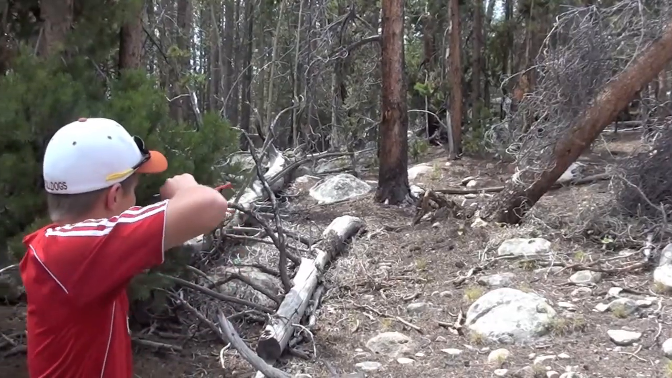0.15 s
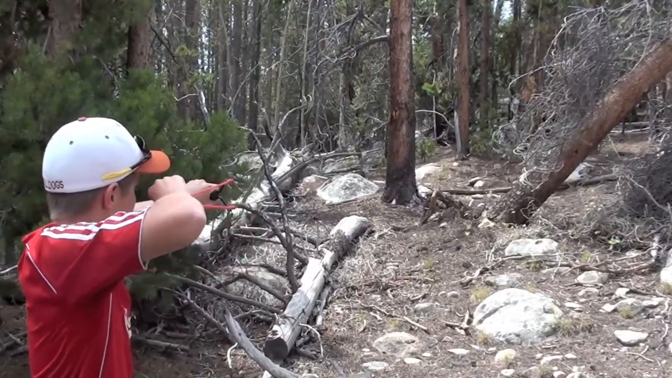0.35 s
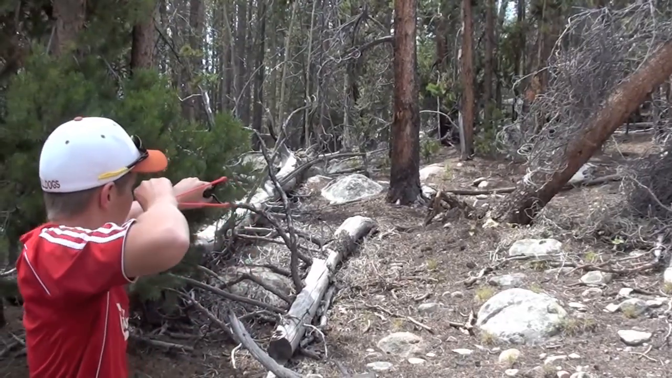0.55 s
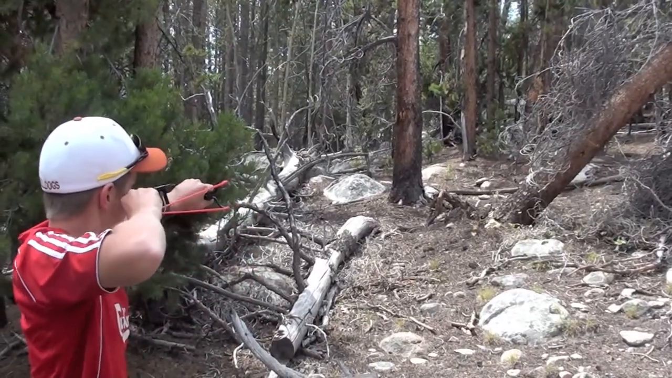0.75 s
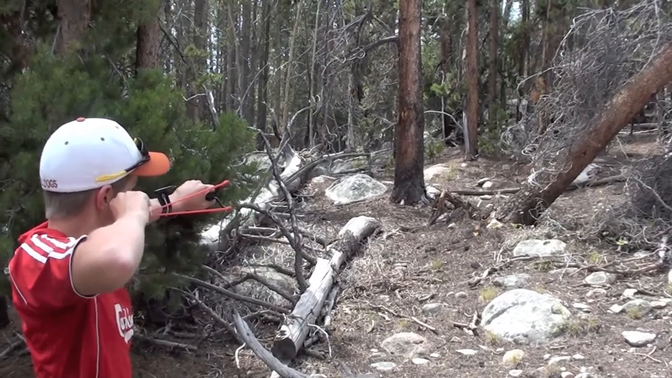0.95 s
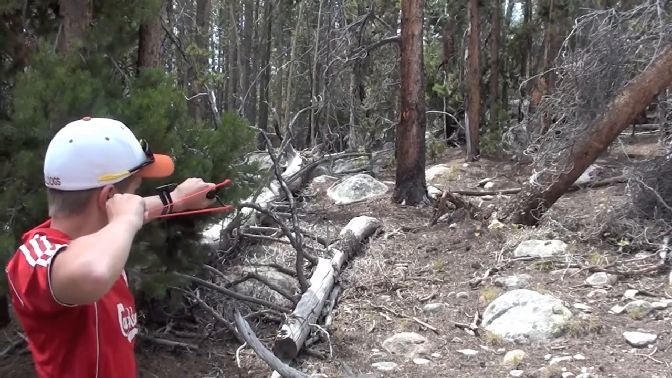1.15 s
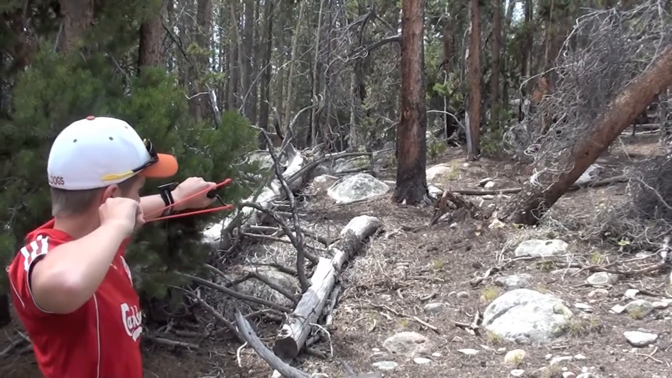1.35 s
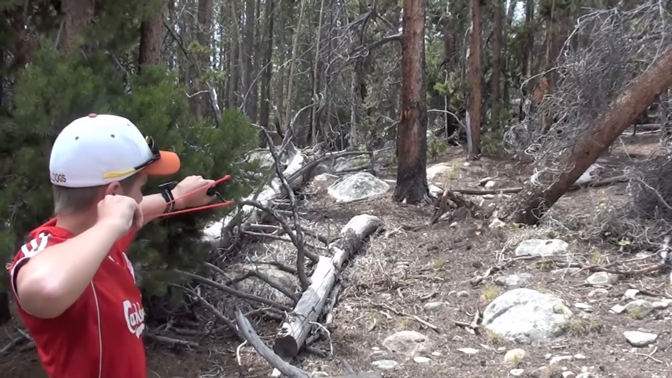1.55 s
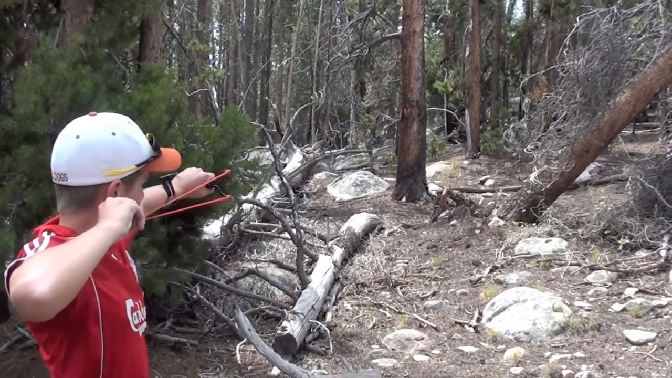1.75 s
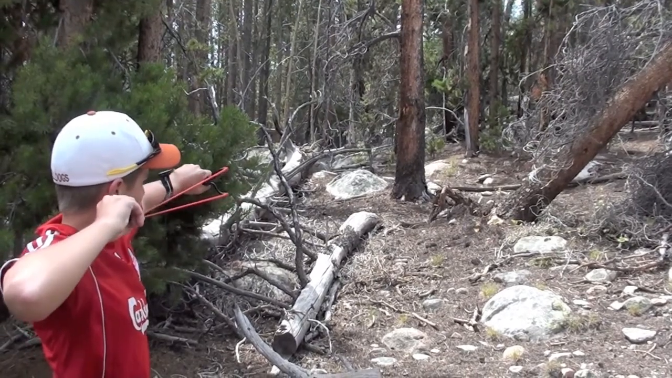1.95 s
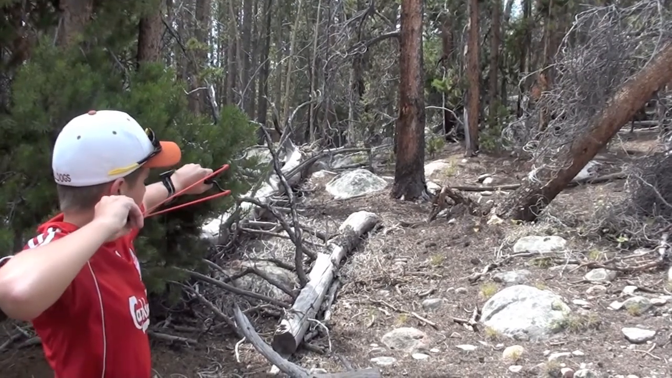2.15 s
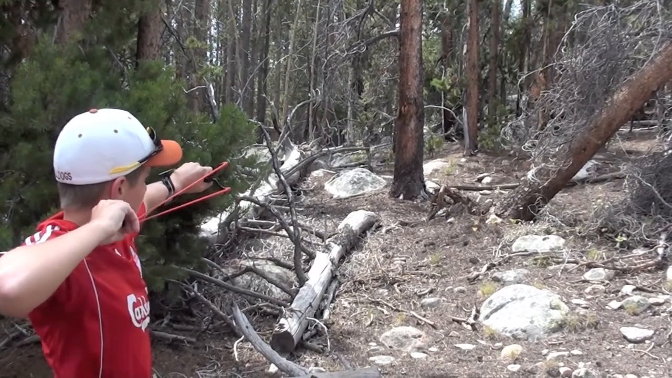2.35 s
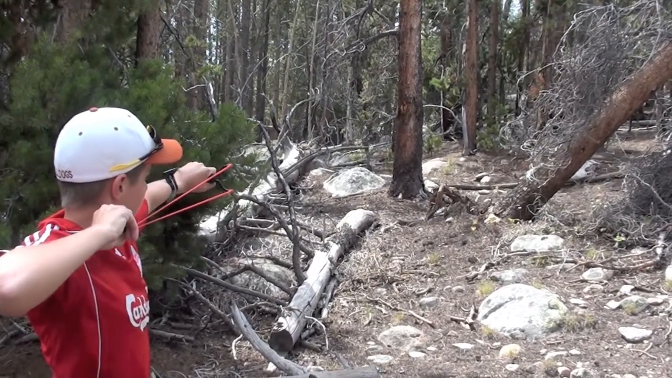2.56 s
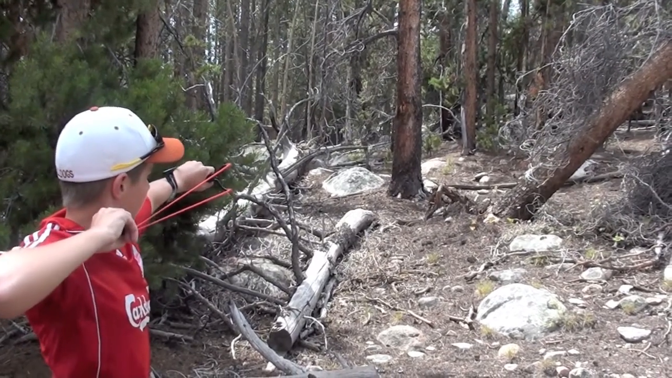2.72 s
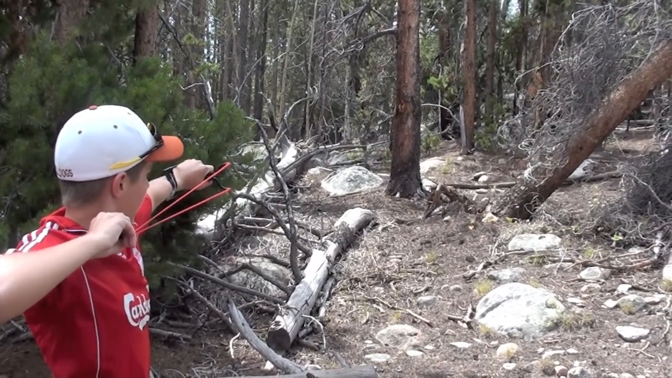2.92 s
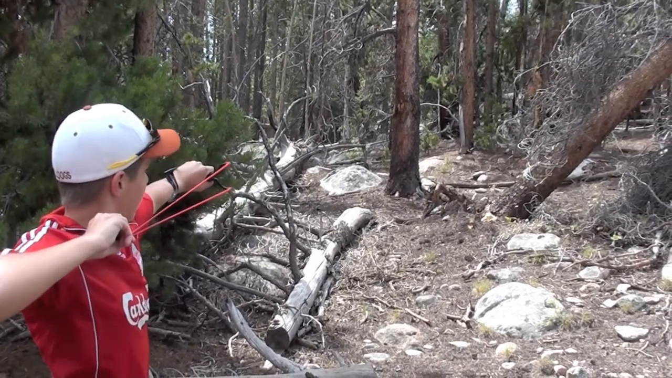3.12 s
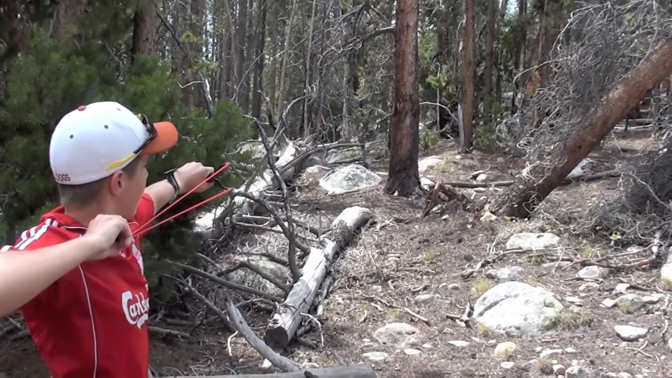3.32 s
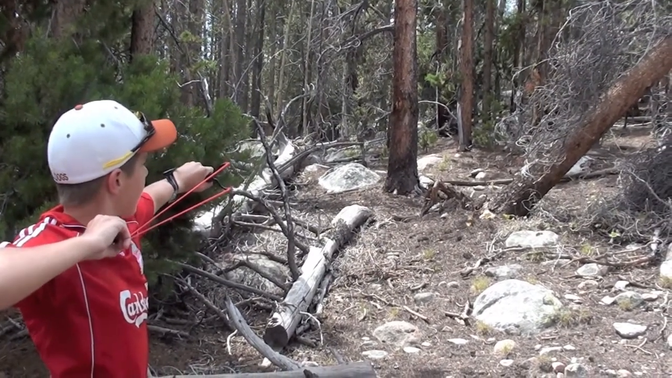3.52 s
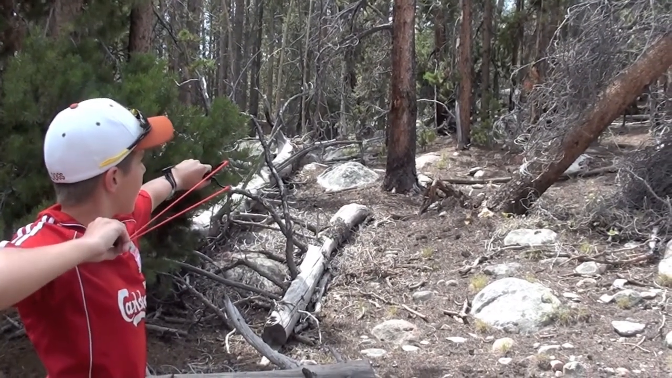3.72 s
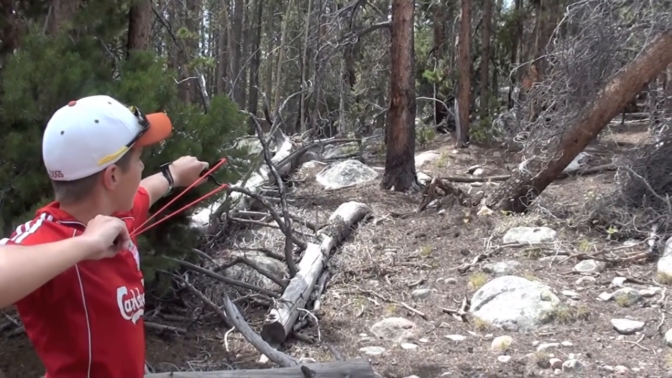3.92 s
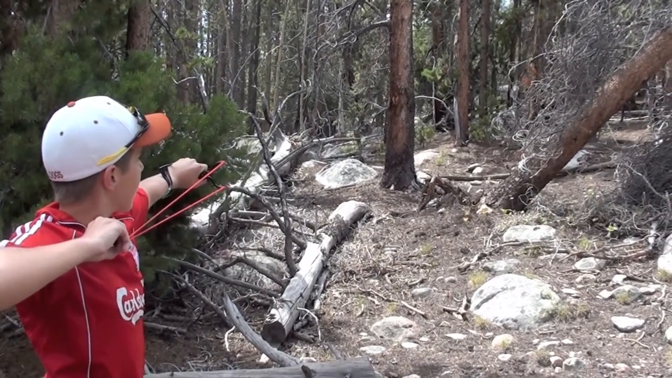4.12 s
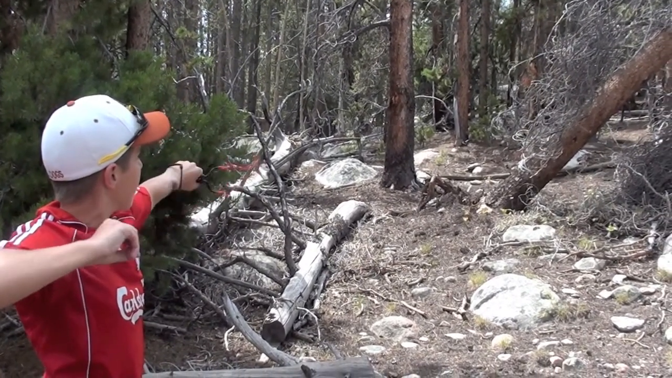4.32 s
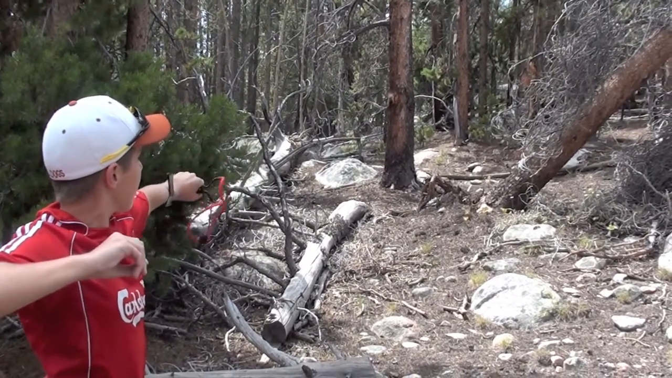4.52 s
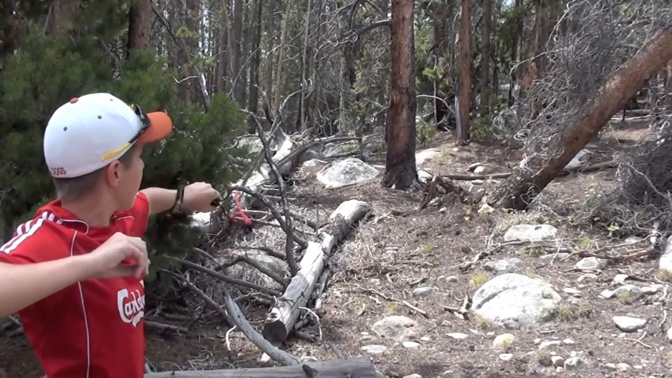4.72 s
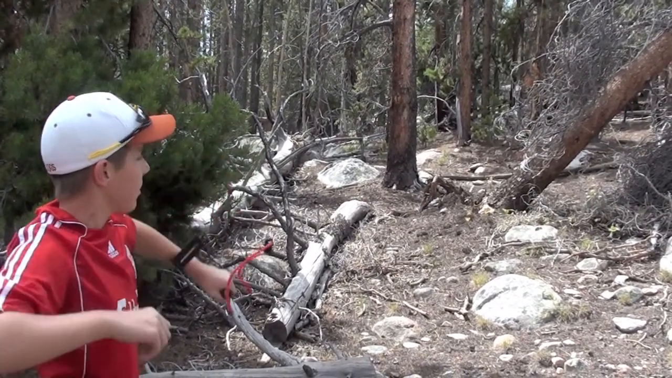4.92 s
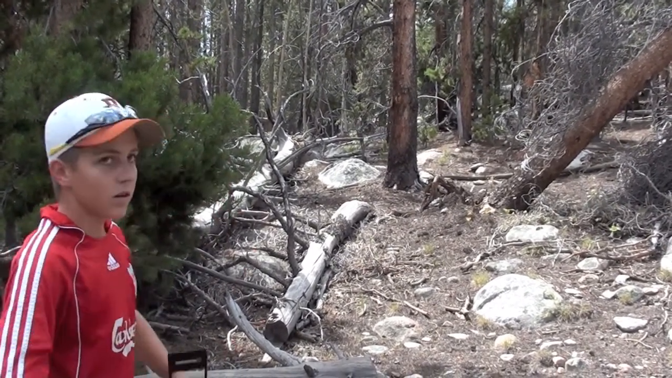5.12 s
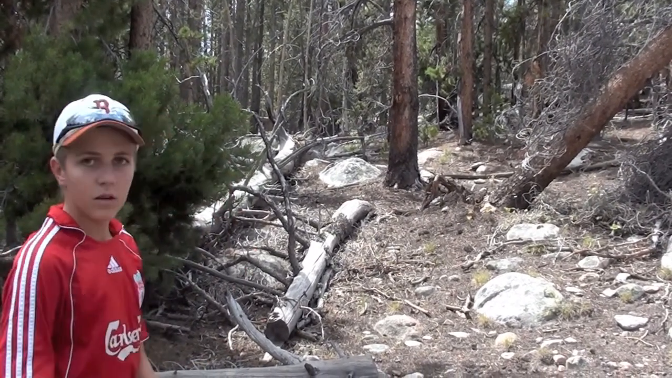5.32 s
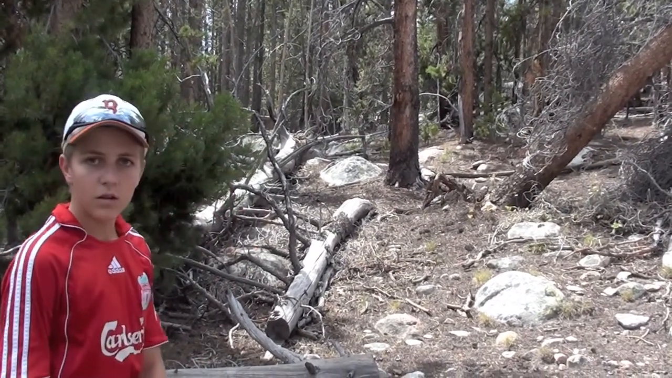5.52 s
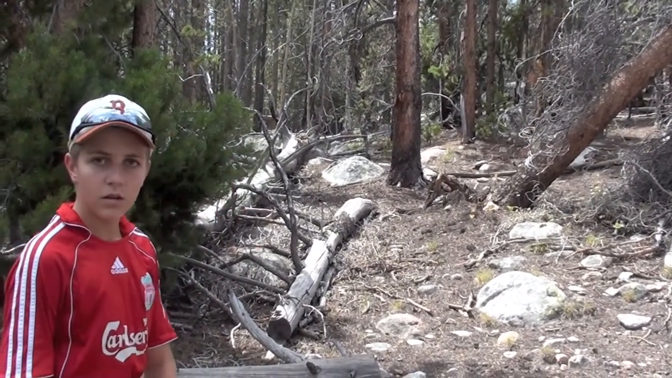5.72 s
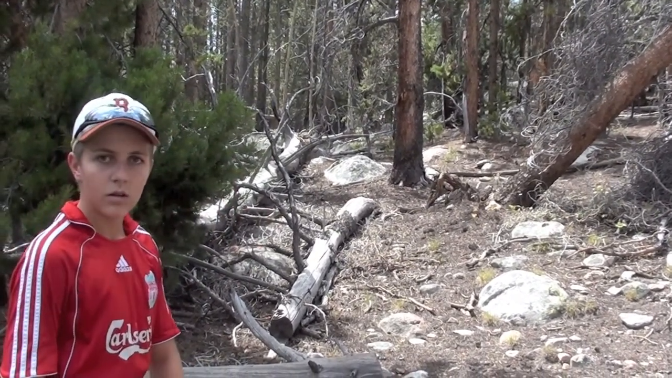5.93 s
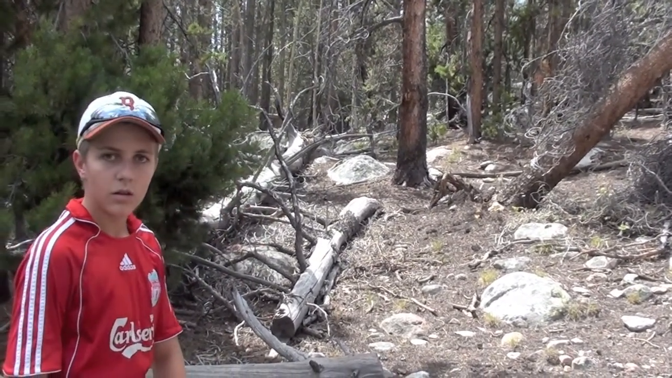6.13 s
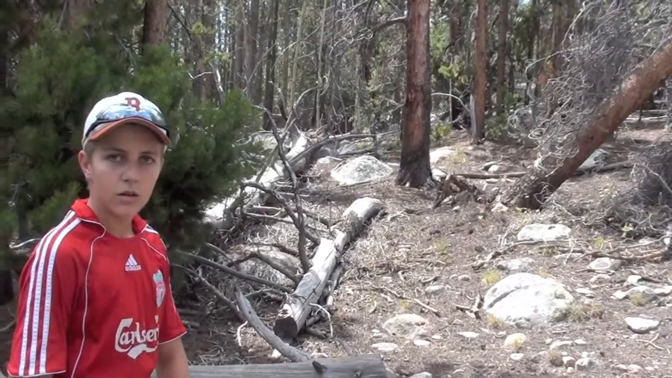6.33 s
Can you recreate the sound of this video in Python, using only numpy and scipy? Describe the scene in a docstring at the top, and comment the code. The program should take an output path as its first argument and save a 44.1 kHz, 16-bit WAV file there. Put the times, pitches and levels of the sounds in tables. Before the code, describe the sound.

Soft wind, hiss and faint cloth rustle, then a sudden close slingshot snap and a hard stone-on-wood crack scattering through the trees.

```python
"""Slingshot in dry woods

A slingshot is fired nearby: swept noise for the rubber's swish, filtered bursts and decaying sines for its
slaps on the fork and jolts of the frame. A moment later the stone cracks on wood, and decaying noise
convolved with the crack scatters it among the trunks. Around it: cloth rustle and ticks, thin rising
bird notes from swept sines, soft wind and hiss from shaped noise, a camera's hum, whine and motor steps.
"""
import sys
import numpy as np
from scipy import signal
from scipy.fft import rfft, irfft
from scipy.io import wavfile
from scipy.ndimage import uniform_filter1d

SR = 44100
rng = np.random.default_rng(int(sys.argv[2]) if len(sys.argv) > 2 else 0)


def materialize(psi):
    """Save the field psi as 16-bit PCM at rate SR to the path in sys.argv[1].

    A 1-D psi becomes a single channel; in a 2-D psi each row is a channel.
    """
    bounded = np.clip(np.atleast_2d(psi).T, -1, 1)
    quanta = np.round(bounded * 32767).astype(np.int16)
    wavfile.write(sys.argv[1], SR, quanta)


N = 281005
T = np.arange(N) / SR
BIN_HZ = np.fft.rfftfreq(N, 1 / SR)

# bands and pouch slapping: start_s, level_db, decay_s, brightness_db_per_octave
SLAPS = [(4.3675, -25, .0005, 4), (4.385, -7.5, 0.001, -1), (4.3891, -9.5, .0012, 1.5),
         (4.4038, -19, .0008, 2.5), (4.425, -32, .001, 0), (4.4428, -20, 0.00057, 0),
         (4.4442, -11.5, 0.0011, 1), (4.449, -24.5, 0.0013, 0), (4.4564, -4.5, 0.000075, 3),
         (4.4602, -23, .00085, 1), (4.469, -29.5, .0008, -1), (4.4954, -37, .0006, -1)]
# slap spectrum: freq_hz, level_db
SLAP_COLOUR = [(60, -27.5), (250, -6.5), (520, -6.5), (740, 0.5), (1200, -2.5), (2200, 3), (2900, -4),
               (4300, 3.5), (5800, 2), (8500, 0), (11500, -10), (16000, -23)]
# fork ringing under a slap: freq_hz, relative_level_db, t60_s
FORK_MODES = [(4130, -4, 0.02), (4300, -9, .025), (4760, -27, 0.013), (7240, -8, .025)]
# swish spectrum: freq_hz, level_db
SWISH_COLOUR = [(50, -21), (220, -15), (750, -3), (1300, 2), (2000, 4.5), (3000, 1), (4500, -1),
                (8500, -0.5), (11500, -11.5), (16000, -21)]
# bands let go or snap taut and jolt the frame: start_s, level_db
JOLTS = [(4.3686, -34.5), (4.3845, -27), (4.3933, -24.5), (4.4179, -25.5), (4.424, -41), (4.442, -37)]
# frame modes under a jolt, before the low-pass: freq_hz, relative_level_db, t60_s
FRAME_MODES = [(213, -27, 0.074), (271, -4, 0.067), (468, -14, .05), (724, -3, 0.058), (933, -10, 0.071),
               (1454, -9.5, 0.099)]
# stone strikes wood and skips: start_s, level_db, decay_s
STRIKES = [(4.5678, -8.5, 0.00037), (4.5688, -11.5, 0.00054), (4.5709, -14.5, 0.0016)]
# strike spectrum: freq_hz, level_db
STRIKE_COLOUR = [(100, -38), (400, -23), (720, -6), (950, -14.5), (1400, -2), (2300, 2.5), (3300, 1),
                 (5000, -0.5), (8200, -0.5), (11000, -10), (16000, -13)]
# struck wood: freq_hz, level_db, t60_s
WOOD_MODES = [(714, -42, 0.022), (1473, -26, 0.058), (3360, -9, 0.012), (4750, -15, 0.014),
              (7350, -19, 0.014)]
# echo spectrum among the trunks: freq_hz, level_db
WOODS_COLOUR = [(100, -6), (600, -4), (1400, -4), (2300, -6.5), (4200, -4), (7500, -11.5), (11000, -14),
                (16000, -15)]
# echo decay among the trunks: freq_hz, t60_s
WOODS_T60 = [(200, 0.42), (1000, 0.96), (2200, 0.67), (4000, 0.48), (7500, 0.38), (15000, .17)]
# ticks of pouch, sleeve and dry litter: start_s, level_db, decay_s, centre_hz, width_octaves
TICKS = [(0.023, -49, .008, 1090, .6), (.041, -47.5, 0.0095, 1670, 1.04), (.128, -43, 0.0041, 800, 0.33),
         (.136, -50.5, 0.023, 310, 0.3), (.1538, -49, .001, 2500, 0.81), (0.3614, -38, 0.00043, 6400, .25),
         (.3995, -48, .002, 7200, 0.14), (.4495, -54, .001, 5500, .5), (.58, -48.5, 0.0094, 700, 0.46),
         (.5871, -50, .0037, 2400, 1.2), (5.436, -50, .002, 5100, 0.18), (5.449, -46.5, .0015, 6340, .28),
         (5.8202, -49.5, 0.0028, 4500, 0.47), (6.125, -51, .0015, 7000, .25)]
# sleeve rustle spectrum: freq_hz, level_db
SLEEVE_COLOUR = [(80, -15), (300, 7), (900, 4), (1600, -2.5), (4000, -10), (7000, -6), (10000, -12),
                 (16000, -15)]
# cloth crease spectrum: freq_hz, level_db
CREASE_COLOUR = [(200, -13), (1500, -2), (7000, -4.5), (10000, -11), (16000, -27)]
# thin bird calls: start_s, length_s, start_hz, end_hz, level_db (hz before waver, level before flicker)
CHIRPS = [(0.202, 0.12, 7730, 8020, -52), (0.562, 0.11, 7100, 7600, -61), (3.155, 0.092, 7150, 7620, -61.5),
          (5.402, 0.095, 7000, 7700, -61.5)]
# wind and hiss spectrum: freq_hz, level_db
AIR_COLOUR = [(20, -20), (48, -13), (80, -3), (140, -3), (300, 0), (600, 0), (850, -2.5), (1300, -9),
              (2400, -11.5), (4200, -13), (7300, -13), (9000, -14.5), (15500, -15)]
# left-right difference of the air: freq_hz, side_to_mid_db
AIR_SIDE = [(60, -18), (99, -15.5), (160, -11), (270, -8), (450, -7.5), (740, -6), (1220, -0.5),
            (2010, -1.5), (3330, -4.5), (5500, -7), (9080, -24.5), (15000, -59)]
# steady camera tones: freq_hz, rms_level_db
CAMERA_TONES = [(80.7, -82), (8393, -75.5)]
# lens motor runs, before step-to-step variation: start_s, end_s, level_db, ring_hz, t60_s
MOTOR_RUNS = [(0, 2.7, -59, 4230, 0.018), (2.7, 5.1, -62, 4250, .016), (4.05, 6.1, -65.5, 4130, 0.088),
              (5.82, 7, -63, 4180, .05)]
# left-right difference of near sounds, before the spread setting: freq_hz, level_db
PORT_SIDE = [(100, -36), (700, -17), (2600, -30), (4000, -18), (5200, -10), (8500, -13), (10500, -30),
             (13000, -62)]

# the rubber rushes forward and swings to and fro, weaker on each pass
RELEASE_S, FIRST_PASS_DELAY_S, SWING_S = 4.364, 0.025, 0.037
SWISH_DB, LOSS_DB_PER_PASS = -25.5, 8
SWISH_RISE_DB_PER_S, SWISH_FALL_DB_PER_S = 946, 642
FLAPS_PER_S, FLAPS_DB = 200, -7  # loose rubber, relative to the swish
# the sleeve rustles while the arm lifts, then dies away as the draw slows
SLEEVE_DB, LIFT_END_S, SETTLE_S = -59.5, 0.49, 0.37
CREASES_PER_S, CREASES_DB = 35, -9.5  # relative to the rustle
AIR_DB = -57.5  # before wind swells and the small left-right balance
FIRST_STEP_S, STEPS_PER_S = 0.012, 30
EDGE_HZ = 15900


def slingshot(flutter_db=3.5, flutter_hz=350, soft_hz=1800, flap_decay_s=0.00044):
    """Fluttering rubber swishes; each slap cracks and rings the fork, each soft jolt thumps the frame."""
    rush = noise(SWISH_COLOUR) * amp(flutter_db * drift(flutter_hz))
    flaps = amp(FLAPS_DB) * crackle(FLAPS_PER_S, flap_decay_s, SLAP_COLOUR)
    out = swings() * (rush + flaps)
    fork = ring(FORK_MODES)
    low_pass = signal.butter(2, soft_hz, fs=SR, output="sos")
    thump = signal.sosfilt(low_pass, ring(FRAME_MODES))
    for start_s, db, decay_s, bright in SLAPS:
        add_burst(out, start_s, db, decay_s, lambda hz: read(SLAP_COLOUR, hz) + bright * np.log2(hz))
        drive = np.sqrt(decay_s / 0.001)  # a longer slap drives the fork harder
        add(out, start_s, amp(db - 7.5) * drive * fork)
    for start_s, db in JOLTS:
        add(out, start_s, amp(db) * thump)
    return out


def swings(count=3):
    """Gain of the swish: it swells and fades around each pass of the bands."""
    since_s, gain = T - RELEASE_S, np.zeros(N)
    for k in range(count):
        late_s = since_s - FIRST_PASS_DELAY_S - k * SWING_S
        away_db = np.maximum(-late_s * SWISH_RISE_DB_PER_S, late_s * SWISH_FALL_DB_PER_S)
        gain = np.maximum(gain, amp(SWISH_DB - k * LOSS_DB_PER_PASS - away_db))
    return gain * (since_s > 0)


def stone():
    """A hard crack, two quick skips and the short ring of dry wood."""
    out = np.zeros(N)
    for start_s, db, decay_s in STRIKES:
        add_burst(out, start_s, db, decay_s, lambda hz: read(STRIKE_COLOUR, hz))
    add(out, STRIKES[0][0], ring(WOOD_MODES))
    return out


def stone_echo(db=2):
    """The whole strike leaves for the trees as one sharp click."""
    click = np.zeros(N)
    add_burst(click, STRIKES[0][0], db, 0, lambda hz: read(STRIKE_COLOUR, hz))
    return woods(click, build_s=0.0064)


def woods(x, build_s=0.006, scatter_db=1.0, early_db=10.5, early_s=0.033, wide_db=-11.5, wide_hz=8500):
    """Many trunks each return a small echo: the first few hundredths of a second are louder, and the treble
    dies first."""
    white, sizes = rng.standard_normal((2, SR)), rng.standard_normal(SR)
    echoes = white * amp(scatter_db * unit(uniform_filter1d(sizes, size=60)))
    hz, t, bands = signal.stft(echoes, SR, nperseg=256)
    t60_s = read(WOODS_T60, hz)[:, None]
    decay = amp(read(WOODS_COLOUR, hz)[:, None] - 60 * t / t60_s)
    bands *= decay * np.sqrt(np.log(1e6) / (t60_s * SR))  # equal energy at any t60
    tail = signal.istft(bands, SR, nperseg=256)[1]
    t = T[:tail.shape[1]]
    build = 1 - np.exp(-(t / build_s) ** 2)
    tail *= build * amp(early_db * np.exp(-t / early_s))
    mid, side = signal.fftconvolve(x[None], tail, axes=1)[:, :N]
    low_pass = signal.butter(8, min(wide_hz, SR / 3), fs=SR, output="sos")
    side = signal.sosfilt(low_pass, side)  # the top is centred
    return mid + amp(wide_db) * np.array([side, -side])


def handling(grain_db=2, grain_hz=200, crease_decay_s=0.0015):
    """Grainy cloth rustle, crackling creases and small separate ticks."""
    motion = amp(SLEEVE_DB) / (1 + np.maximum(T - LIFT_END_S, 0) / SETTLE_S)
    rustle = noise(SLEEVE_COLOUR) * amp(grain_db * drift(grain_hz))
    creases = amp(CREASES_DB) * crackle(CREASES_PER_S, crease_decay_s, CREASE_COLOUR)
    out = motion * (rustle + creases)
    for start_s, db, decay_s, centre_hz, octaves in TICKS:
        def hump_db(hz):
            """Smooth peak around the tick's centre."""
            return -40 * np.log10(1 + (np.log2(hz / centre_hz) / octaves) ** 2 / 4)
        add_burst(out, start_s, db, decay_s, hump_db)
    return out


def bird(waver=0.004, flicker_db=4.5):
    """Near-pure rising notes that swell quickly and fade."""
    out, wobble, flicker = np.zeros(N), drift(150), drift(70)
    for start_s, length_s, start_hz, end_hz, db in CHIRPS:
        u = np.clip((T - start_s) / length_s, 0, 1)
        glide_hz = end_hz + (start_hz - end_hz) * (1 - u) ** 2
        hz = glide_hz * (1 + waver * wobble)
        swell = np.sin(np.pi * u ** 0.45)
        tone = np.sin(2 * np.pi * np.cumsum(hz) / SR)
        out += amp(db + flicker_db * flicker) * swell * tone
    return out


def air(swell_db=1.5):
    """Soft wind in the treetops over smooth microphone hiss: shaped noise, its lows slowly swelling."""
    mid, side = rfft(rng.standard_normal((2, N))) * amp(read(AIR_COLOUR, BIN_HZ))
    side *= amp(read(AIR_SIDE, BIN_HZ))
    both = amp(AIR_DB) * unit(irfft([mid + side, mid - side], N))
    wind = signal.sosfiltfilt(signal.butter(2, 1200, fs=SR, output="sos"), both)
    return both + wind * (amp(swell_db * drift(3.0)) - 1)


def camera(uneven_db=2, size_db=1, detune=0.006):
    """A faint hum and whine; the lens motor steps regularly, strong and weak in turn, each step a ring."""
    out = sum(amp(db) * np.sqrt(2) * np.sin(2 * np.pi * hz * T) for hz, db in CAMERA_TONES)
    times_s = np.arange(FIRST_STEP_S, T[-1], 1 / STEPS_PER_S)
    for k, (size, tune) in enumerate(rng.standard_normal((len(times_s), 2))):
        for start_s, end_s, db, hz, t60_s in MOTOR_RUNS:
            if start_s <= times_s[k] < end_s:
                step_db = db + uneven_db * (-1) ** k + size_db * size
                add(out, times_s[k], ring([(hz * (1 + detune * tune), step_db, t60_s)]))
    return out


def placed(x, pan_db, spread_db):
    """Two close microphone ports: small differences of level and phase."""
    side_gain = amp(spread_db + read(PORT_SIDE, BIN_HZ))
    side = irfft(1j * rfft(x) * side_gain, N)
    return np.array([amp(pan_db / 2) * x + side, amp(-pan_db / 2) * x - side])


def crackle(per_s, decay_s, colour):
    """Small contacts of random time and size, at rms 1."""
    chance, size = rng.random((2, N))
    grain = burst(decay_s, lambda hz: read(colour, hz))
    hits = (chance < per_s / SR) * size
    return unit(signal.oaconvolve(hits, grain)[:N])


def burst(decay_s, colour_db, size=4096):
    """One contact: a dying puff of even spectrum through a causal filter colour_db(hz)."""
    t, hz = np.arange(size) / SR, abs(np.fft.fftfreq(size, 1 / SR)) + 10
    shape = np.exp(-t / max(decay_s, 1 / SR))
    z = np.fft.fft(shape * rng.standard_normal(size))
    z /= np.sqrt(uniform_filter1d(abs(z) ** 2, size=160, mode="wrap"))  # even out the spectrum
    log_gain = np.log(amp(np.maximum(colour_db(hz), -80)))
    minimum_phase = np.exp(np.conj(signal.hilbert(log_gain)))
    puff = np.fft.ifft(z * minimum_phase).real
    puff = np.roll(puff, size // 64)  # 64-sample lead, undone in add_burst
    return unit(puff) * np.sqrt(np.mean(shape ** 2))


def add_burst(mix, start_s, db, decay_s, colour_db):
    """Places one contact at its time."""
    add(mix, start_s - 64 / SR, amp(db) * burst(decay_s, colour_db))


def ring(modes):
    """Dying modes of a struck body, as the speed of its surface."""
    t = np.arange(SR // 4) / SR
    travel = np.zeros(len(t))
    for hz, db, t60_s in modes:
        travel += amp(db - 60 * t / t60_s) * np.sin(2 * np.pi * hz * t) * SR / (2 * np.pi * hz)
    return np.gradient(np.pad(travel, 1))  # the air hears the surface's speed


def noise(colour):
    """Steady noise with a given spectrum, at rms 1."""
    spectrum = rfft(rng.standard_normal(N))
    return unit(irfft(spectrum * amp(read(colour, BIN_HZ)), N))


def drift(hz):
    """Random wandering up to a rate, at rms 1."""
    spectrum = rfft(rng.standard_normal(N))
    return unit(irfft(spectrum / (1 + (BIN_HZ / hz) ** 4), N))


def add(mix, start_s, sound):
    """Mixes a sound in at a time."""
    part = mix[max(round(start_s * SR), 0):][:len(sound)]
    part += sound[:len(part)]


def amp(db):
    """Decibels to gain."""
    return 10 ** (np.asarray(db) / 20)


def unit(x):
    """Scales to rms 1."""
    return x / np.sqrt(np.mean(x ** 2) + 1e-20)


def read(points, hz):
    """Reads a table along a log-frequency axis."""
    f, value = np.transpose(points)
    return np.interp(np.log(hz + 1), np.log(f + 1), value)


def scene():
    """The near slingshot is almost dry; the distant strike wakes the woods."""
    shot = slingshot()
    near = placed(shot + handling() + bird(), pan_db=0.1, spread_db=-3.5)
    near = near + amp(-17.0) * woods(shot, build_s=0.015)
    far = placed(stone(), pan_db=0.0, spread_db=-8) + stone_echo()
    balance = amp([[0.2], [-0.2]])  # left, right
    return near + far + air() * balance + camera()


def record(dry):
    """The band limit of the recorder: a linear-phase low-pass."""
    low_pass = signal.firwin(301, EDGE_HZ, window=("kaiser", 8), fs=SR)
    return signal.oaconvolve(dry, low_pass[None], "same")


dry = scene()
out = record(dry)
materialize(out)
```